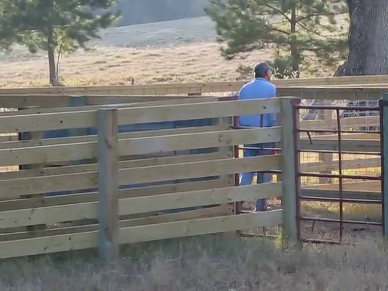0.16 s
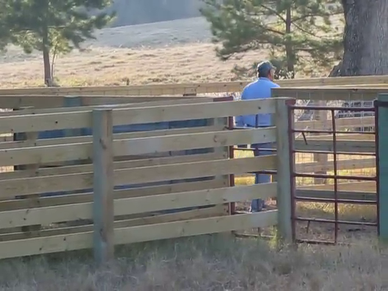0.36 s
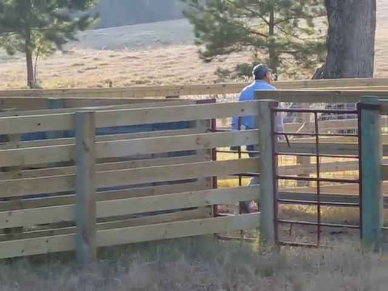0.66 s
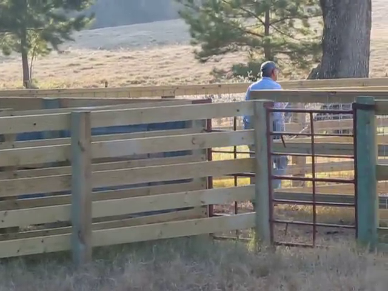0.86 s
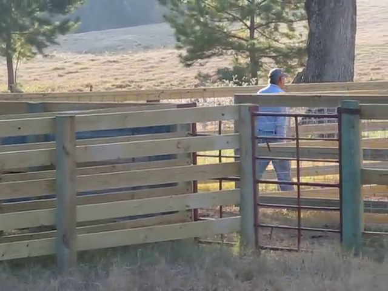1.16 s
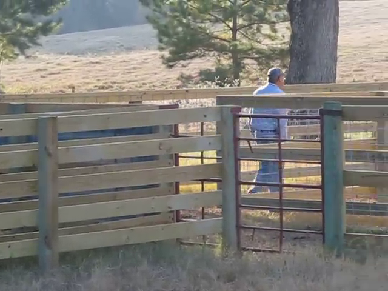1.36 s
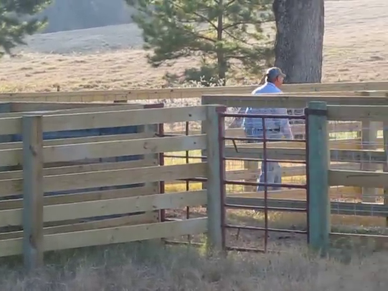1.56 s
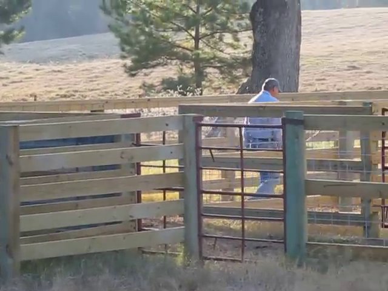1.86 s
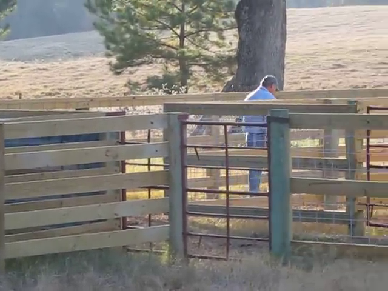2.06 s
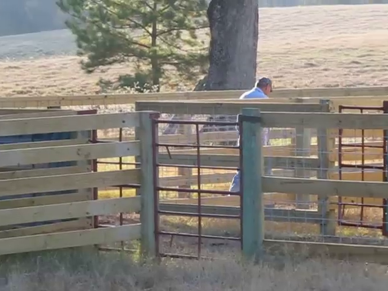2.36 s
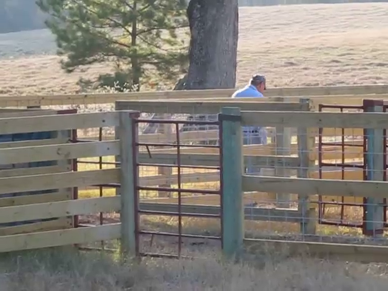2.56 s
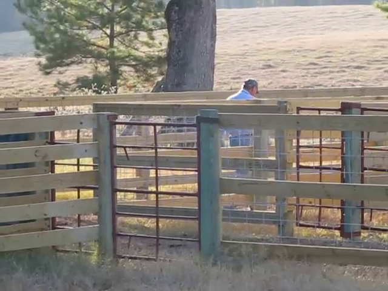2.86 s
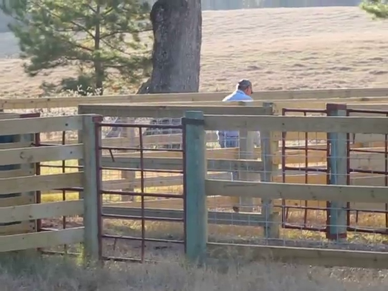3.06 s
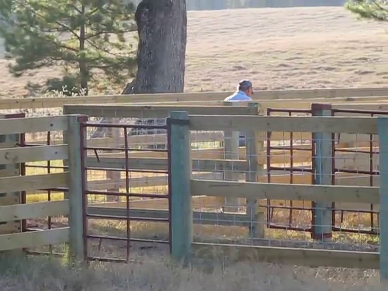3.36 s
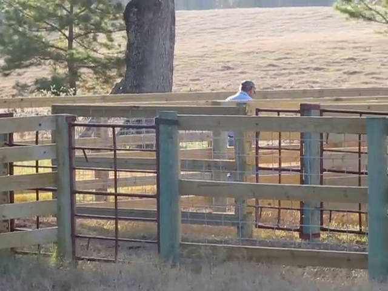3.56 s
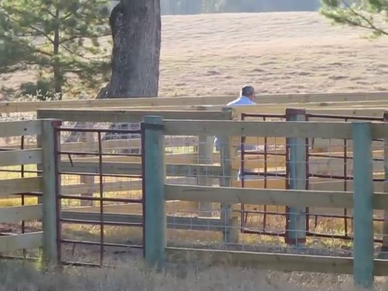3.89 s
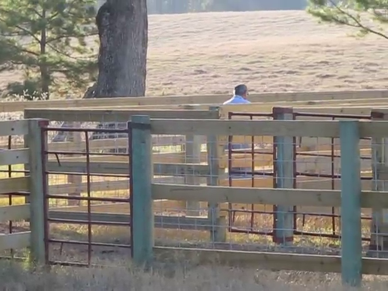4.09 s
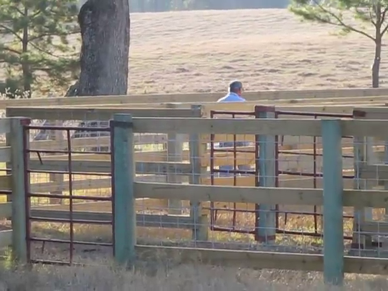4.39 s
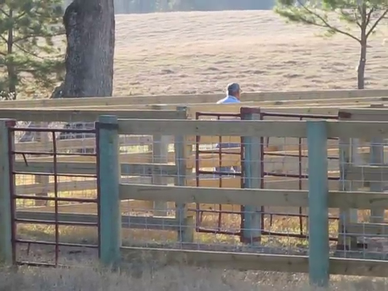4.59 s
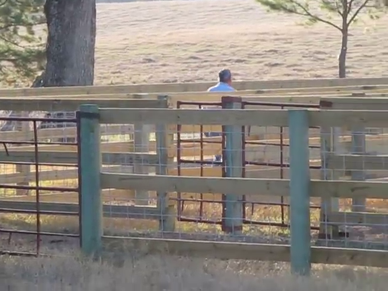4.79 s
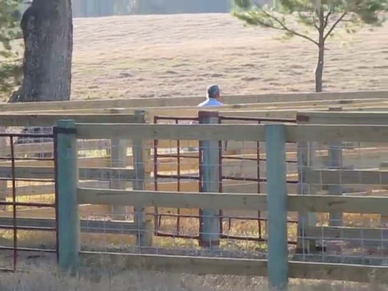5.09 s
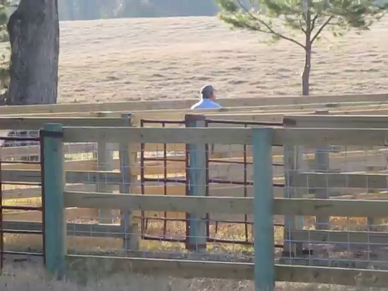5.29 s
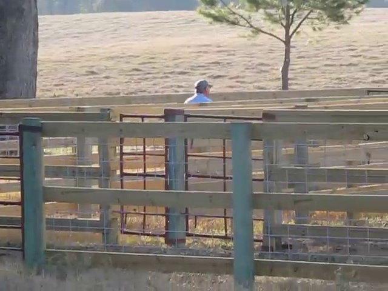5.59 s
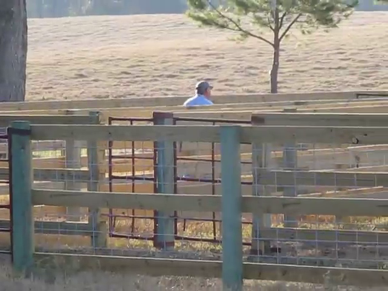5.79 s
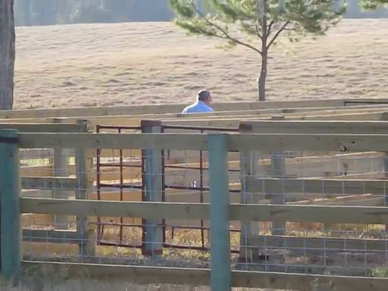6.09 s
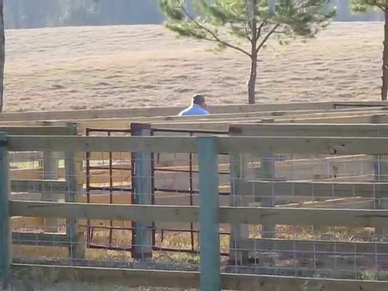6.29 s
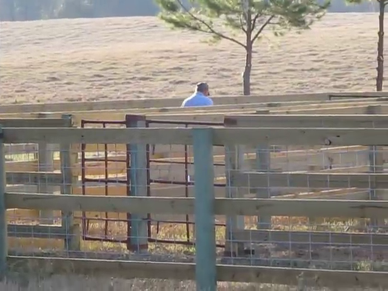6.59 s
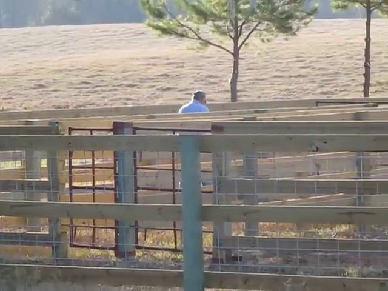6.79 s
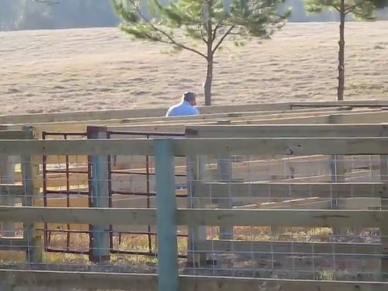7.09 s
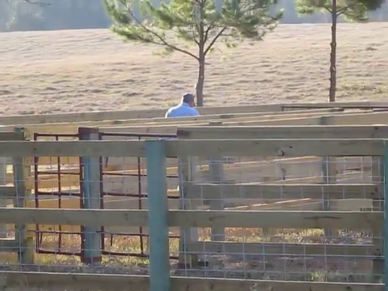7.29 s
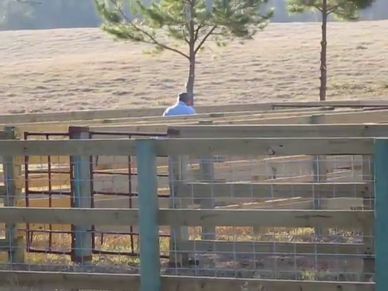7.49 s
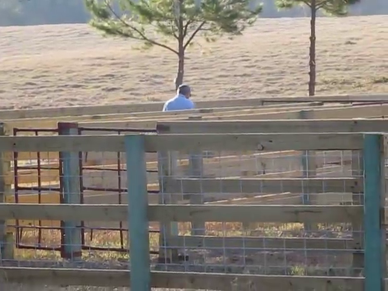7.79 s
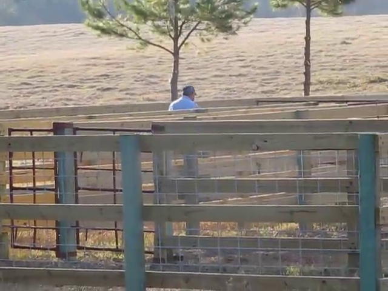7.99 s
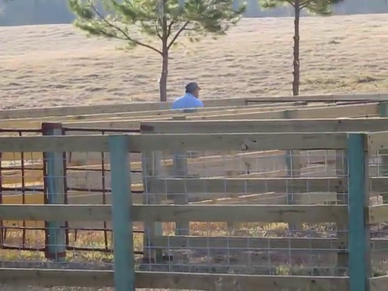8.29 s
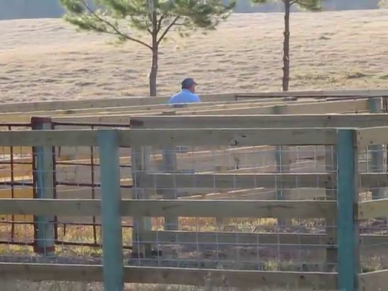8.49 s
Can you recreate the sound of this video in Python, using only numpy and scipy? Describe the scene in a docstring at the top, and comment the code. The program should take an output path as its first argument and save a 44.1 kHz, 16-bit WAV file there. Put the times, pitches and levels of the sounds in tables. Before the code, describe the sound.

Quiet field ambience with light breeze and faint birds, heard through a camera microphone with small close ticks at the start and a faint electronic whine. One distant cow moo soon rises from a low hum into a raspy, open bellow, with a dull tail from fences and trees. Calm follows, with whistling birds, occasional wooden knocks and a barely audible engine, until low wind buffeting swells at the end while the ticks resume.

```python
"""First a lens drive ticks close by, over a thin camera whine, faint bird calls and a light breeze.
Then a cow some way off moos once: fold pulses and turbulence ring nose and mouth resonances,
as a rising closed-mouth hum breaks into a hoarse, open bellow. Boards knock dully; birds are gliding
near-sines, a far engine is two wavering harmonics, and a gust of filtered noise rumbles at the end."""
import sys
import numpy as np
from scipy import signal
from scipy.fft import rfft, irfft
from scipy.io import wavfile
from scipy.ndimage import uniform_filter1d

SR = 44100
rng = np.random.default_rng(int(sys.argv[2]) if len(sys.argv) > 2 else 0)


def generate_wav(sig):
    """Save sig (samples, or channels by samples) to the path in sys.argv[1] as 16-bit PCM at SR."""
    pcm = np.round(np.clip(np.atleast_2d(sig).T, -1, 1) * 32767).astype(np.int16)
    wavfile.write(sys.argv[1], SR, pcm)


N = 381448
TIME = np.arange(N) / SR


def from_db(db):
    """Decibels to gain."""
    return 10 ** (np.asarray(db) / 20)


def rms_one(x):
    """Scale to rms 1."""
    return x / np.sqrt(np.mean(x ** 2) + 1e-20)


def in_time(rows, start_s=0):
    """Each column of a curve, interpolated at every sample."""
    s, *columns = np.transpose(rows)
    return [np.interp(TIME - start_s, s, column) for column in columns]


def at_hz(points, hz):
    """Read a spectrum on a log-frequency axis."""
    f, value = np.transpose(points)
    return np.interp(np.log(hz + 1e-3), np.log(f), value)


def between(start_s, end_s, fade_s):
    """Gate that fades in after start and out before end."""
    return np.clip(np.minimum(TIME - start_s, end_s - TIME) / fade_s, 0, 1)


def attack(start_s, length_s):
    """Gain that rises linearly from 0 to 1."""
    return np.clip((TIME - start_s) / length_s, 0, 1)


def bump(s, db, length_s):
    """Brief bell-shaped swell."""
    return from_db(db) * np.exp(-((TIME - s) / length_s) ** 2)


def cut(x, hz, kind, order=2):
    """Butterworth filter."""
    return signal.sosfilt(signal.butter(order, hz, kind, fs=SR, output="sos"), x + 1e-18)


def drift(rate_hz):
    """Random wavering up to the given rate, rms 1."""
    return rms_one(cut(rng.standard_normal(N + SR), rate_hz, "low")[SR:])


def running_sine(hz):
    """Sine that follows a varying frequency."""
    return np.sin(2 * np.pi * np.cumsum(hz) / SR)


def resonate(x, hz, width_hz):
    """Two-pole resonance, gain 1 at its top."""
    r = np.exp(-np.pi * width_hz / SR)
    zeros = np.array([1, 0, -1]) * (1 - r * r) / 2
    poles = [1, -2 * r * np.cos(2 * np.pi * hz / SR), r * r]
    return signal.lfilter(zeros, poles, x + 1e-18)


def body(x, modes):
    """Parallel resonances, each passed twice so that the valleys stay dark."""
    out = 0
    for hz, width_hz, db in modes:
        pass_hz = width_hz * 1.53  # two passes narrow the peak again
        out = out + from_db(db) * resonate(resonate(x, hz, pass_hz), hz, pass_hz)
    return out


def even(x):
    """Hold the short-term level at 1."""
    return x / np.sqrt(np.abs(uniform_filter1d(x * x, size=2400)) + 1e-12)


def pan(x, left_db):
    """Place a sound by level difference, left minus right."""
    return np.array([x * from_db(left_db / 2), x * from_db(-left_db / 2)])


# hum onset, break into the bellow, folds go slack
HUM_S, BREAK_S, SLACK_S = 1.454, 1.81, 3.02
SLACK_OCTAVES_PER_S, SLACK_DB_PER_S = 31, 143
# vocal folds before slackening: (time [s], pitch [Hz])
FOLD_PITCH = [(1.45, 71.2), (1.55, 86.1), (1.65, 115.6), (1.79, 173.3), (1.9, 191.6), (2.36, 231.4),
              (2.47, 236.2), (2.56, 255.3), (2.68, 253.7), (2.88, 236.4), (3.02, 199.3)]
# hoarseness, clipped to 0-1 in use: (time [s], roughness [ratio])
HOARSENESS = [(1.78, 0.05), (1.88, 0.99), (2.26, 1.02), (2.44, 0.51), (2.57, .76), (2.72, .35),
              (2.88, 0.71), (3.0, 0.97), (3.05, .6)]
# mouth opening: (time [s], level above the closed mouth [dB])
MOUTH_OPENING = [(1.81, -2), (1.96, 17.5), (2.14, 21), (2.28, 23), (2.53, 28.5), (2.73, 29), (2.95, 26),
                 (3.02, 20.5)]


def voice_controls():
    """Pitch, roughness, mouth opening and breath gain; slack folds drop in pitch and die away."""
    slack_s = np.clip(TIME - SLACK_S, 0, None)
    pitch_hz = np.maximum(in_time(FOLD_PITCH)[0] * 2 ** (-SLACK_OCTAVES_PER_S * slack_s), 40)
    rough = np.clip(in_time(HOARSENESS)[0], 0, 1)
    breath = between(HUM_S, 3.2, .05) * from_db(-SLACK_DB_PER_S * slack_s)
    return pitch_hz, rough, in_time(MOUTH_OPENING)[0], breath


def vocal_folds(pitch_hz, rough):
    """Phase, pulses and rasp: strained folds beat in groups of two and four and lose step at random."""
    cycles = np.cumsum(pitch_hz * (1 + .045 * rough ** 2 * drift(89))) / SR
    phase = 2 * np.pi * cycles
    pulses = rms_one(np.diff(np.floor(cycles), prepend=0))
    pairs = 0.61 * np.cos(phase / 2 + 0.42 * drift(15))
    fours = 0.29 * np.cos(phase / 4 + 1.7 * drift(24))
    pulses = pulses * (1 + pairs + fours + 0.32 * rough * drift(140))
    # one short puff of turbulence per cycle
    puffs = .2 + np.cos(phase / 2) ** 4
    rasp = rough * rms_one(rng.standard_normal(N) * puffs)
    return phase, pulses, rasp


HUM_DB, HUM_ATTACK_S, HUM_FOLLOWS_MOUTH, HUM_CHAOS_LOSS_DB = -42, .18, 0.19, 11


def hum(phase, pitch_hz, rough, mouth_db):
    """Fundamental and second harmonic; it grows as the mouth opens and loses strength to chaos."""
    # the second is strong only within a closed-mouth resonance: (frequency [Hz], level [dB])
    closed_mouth = [(150, 0.0), (190, -1.0), (235, -21), (340, -15.5), (430, -11), (470, -20), (510, -18)]
    second = from_db(at_hz(closed_mouth, 2 * pitch_hz))
    slip = 1.1 * rough ** 3 * drift(45)  # chaos blurs the fundamental's line
    gain_db = HUM_DB + HUM_FOLLOWS_MOUTH * mouth_db - HUM_CHAOS_LOSS_DB * rough ** 4
    tone = np.sin(phase + slip) + second * np.sin(2 * phase)
    return from_db(gain_db) * attack(HUM_S, HUM_ATTACK_S) * np.sqrt(2) * tone


# sudden growl surges: (time [s], peak level [dB])
GROWL_SURGES = [(1.948, -32), (2.035, -24.5), (2.101, -26.5), (2.146, -27.5), (2.295, -27), (2.688, -31.5),
                (2.997, -25), (3.024, -31.5)]


def growl():
    """Unsteady 317 Hz tone in short surges."""
    swell = sum(bump(s, db, 0.015) for s, db in GROWL_SURGES)
    return swell * running_sine(317 * (1 + .06 * drift(71)))


NOSE_DB, NOSE_ATTACK_S, NOSE_ROUGH_DB = -38.5, 0.055, 6.5


def nose(pulses, rasp, rough):
    """Nasal resonance at 302 Hz; sets in at the break and grows with roughness."""
    gain = from_db(NOSE_DB + NOSE_ROUGH_DB * (rough - 1)) * attack(BREAK_S, NOSE_ATTACK_S)
    return gain * even(body(cut(pulses * 0.31 + rasp, 211, "high", order=6), [(302, 60, 0)]))


def boards(x, scatter_db=-14, t60_s=.15):
    """Rows of fence boards throw back many small early echoes, which blur the single pulses."""
    t = TIME[:SR // 5]
    fading = rng.standard_normal(len(t)) * from_db(-60 * t / t60_s)
    response = from_db(scatter_db) * rms_one(fading) / np.sqrt(len(t))
    return x + signal.fftconvolve(x, response)[:N]


# closed-mouth levels
THROAT_DB, MUZZLE_DB, HISS_DB = -60.5, -62, -88
# upper resonances fade as the breath runs out
TIRE_S, TIRE_DB_PER_S = 2.3, 1
# above BRIGHT_HZ: dB lost per dB of closing from wide open
BRIGHT_HZ, BRIGHT_FOLLOWS_MOUTH, WIDE_OPEN_DB = 1900, 0.17, 29.5
# lower mouth resonances: (frequency [Hz], width [Hz], relative level [dB])
THROAT_MODES = [(669, 103, -7), (773, 122, 2), (904, 49, 2), (1158, 43, 4.5), (1245.6, 33, 5.5)]
# upper mouth resonances: (frequency [Hz], width [Hz], relative level before bright loss [dB])
MUZZLE_MODES = [(1447, 100, 2), (1530, 88, 4), (1810, 81, 3), (2045, 166, -1), (2350, 152, -6),
                (2800, 79, -11.5)]
# thin hiss of the bellow: (frequency [Hz], width [Hz], relative level [dB])
HISS_MODES = [(3790, 200, -2.5), (5600, 510, -5.5)]


def open_mouth(source, mouth_db):
    """Throat, then muzzle with hiss: resonances that swell with the opening."""
    upper_db = mouth_db - TIRE_DB_PER_S * np.clip(TIME - TIRE_S, 0, None)
    throat = even(cut(body(source, THROAT_MODES), 590, "high", order=6))
    bright_db = BRIGHT_FOLLOWS_MOUTH * (upper_db - WIDE_OPEN_DB)
    opened = [(hz, width_hz, db + bright_db * (hz > BRIGHT_HZ)) for hz, width_hz, db in MUZZLE_MODES]
    muzzle = even(cut(body(source, opened), 3270, "low", order=14))
    hiss = even(body(source, HISS_MODES))
    upper = from_db(MUZZLE_DB + upper_db) * muzzle + from_db(HISS_DB + upper_db) * hiss
    return from_db(THROAT_DB + mouth_db) * throat, upper


def cow(lag_s=.00006):
    """Fold pulses, clean in the hum and chaotic in the bellow, sound through nose and mouth."""
    pitch_hz, rough, mouth_db, breath = voice_controls()
    phase, pulses, rasp = vocal_folds(pitch_hz, rough)
    throat, upper = open_mouth(boards(pulses + 2.2 * rasp), mouth_db)
    low = hum(phase, pitch_hz, rough, mouth_db) + growl() + nose(pulses, rasp, rough)
    left, right = breath * (pan(low, 0.57) + pan(throat, -0.3) + pan(upper, -3.0))
    # the cow stands to the right, so the left port hears it later
    return np.array([np.interp(TIME - lag_s, TIME, left), right])


def strikes(events, modes, decay_s, rise_s):
    """Short gritty contacts ring a body; each event sets its peak."""
    out, count = np.zeros(N + SR), 4000
    t = TIME[:count]
    envelope = np.exp(-t / decay_s) * (1 - np.exp(-t / rise_s))
    for (s, db), grit in zip(events, rng.standard_normal((len(events), count))):
        hit = body(grit * envelope, modes)
        at = int((s - rise_s) * SR)
        out[at:at + count] += from_db(db) * hit / np.abs(hit).max()
    return out[:N]


STEP_S, STOP_AFTER_S, STOP_DB, TICK_SPREAD_DB = .1, .026, -0.5, 1.9
# drive runs: (first step [s], end [s], typical tick peak [dB])
DRIVE_RUNS = [(0.046, 1.09, -46), (7.578, 8.64, -46.5)]
# firmest ticks in those runs: (time [s], least peak level [dB])
FIRMEST_TICKS = [(.147, -41), (.373, -40), (.773, -40.5), (1.047, -38.5), (7.879, -43), (8.279, -43.5)]
# lens housing: (frequency [Hz], width [Hz], relative level [dB])
HOUSING_MODES = [(324, 290, -5.5), (650, 124, 2), (910, 166, 8), (1354, 70, 2), (1656, 150, -1.5),
                 (2560, 180, -5.5)]


def lens_drive():
    """Even steps; the start and stop of each tick in the housing, some firmly."""
    ticks = []
    for first_s, end_s, run_db in DRIVE_RUNS:
        for step_s in np.arange(first_s, end_s, STEP_S):
            for s, db in (step_s, run_db), (step_s + STOP_AFTER_S, run_db + STOP_DB):
                firm = [firm_db for at_s, firm_db in FIRMEST_TICKS if abs(at_s - s) < STOP_AFTER_S / 2]
                usual_db = db + TICK_SPREAD_DB * rng.standard_normal()
                ticks.append((s, max([usual_db] + firm)))
    return strikes(ticks, HOUSING_MODES, decay_s=0.0068, rise_s=.003)


# dull knocks in the pens: (time [s], peak level before echoes [dB])
PEN_KNOCKS = [(4.578, -44.5), (6.958, -44), (7.008, -48), (7.04, -40.5), (7.055, -47), (8.433, -48)]
# board resonances: (frequency [Hz], width [Hz], relative level [dB])
BOARD_MODES = [(420, 60, 14), (621, 59, 12), (925, 145, 12), (1250, 290, -2)]


def pen_knocks():
    """Dull contacts ring the boards."""
    return strikes(PEN_KNOCKS, BOARD_MODES, decay_s=0.01, rise_s=0.00143)


def bird(calls, shape, waver):
    """Near-sine that follows the same glide at every call; a quick waver makes it husky."""
    out, flutter = np.zeros(N), 1 + waver * drift(193)
    for s, hz, db in calls:
        ratio, level_db = in_time(shape, s)
        gate = between(s, s + shape[-1][0], 0.0027)
        out += from_db(db + level_db) * gate * running_sine(hz * ratio * flutter)
    return out


# whistling bird: (start [s], pitch [Hz], level [dB])
WHISTLE_CALLS = [(-.04, 1426, -56.5), (3.55, 1417, -52), (4.025, 1430, -51), (4.58, 1466, -51.5)]
# its arch: (time from start [s], pitch [ratio], added level [dB])
WHISTLE_ARCH = [(0, .77, -18), (.02, .88, -6), (.035, .98, -3), (.052, 1, 0), (.085, .91, 0),
                (.115, .81, -2), (.135, .79, -4), (.16, .82, -18)]
# small bird's chips: (start [s], pitch [Hz], level [dB])
CHIP_CALLS = [(.515, 7200, -65), (2.622, 7870, -58.5), (4.585, 7030, -57.5), (7.315, 7450, -55.5)]
# their dip: (time from start [s], pitch [ratio], added level [dB])
CHIP_DIP = [(0, 1.8, -22), (.012, 1.08, -3), (.022, 1, 6), (.032, 1.01, -1.5), (.045, 1.07, 0),
            (.065, 1.1, -20)]
# faint falling notes: (start [s], pitch [Hz], level [dB])
SLUR_CALLS = [(.79, 2130, -72), (1.485, 2490, -63), (1.55, 2810, -63), (8.15, 3200, -69)]
# their slide: (time from start [s], pitch [ratio], added level [dB])
SLUR_SLIDE = [(0, 0.89, 0), (0.029, 0.97, 8.5), (.08, 0.85, 1), (.14, .82, -8)]


def calling_birds():
    """Arched whistles right of centre; dipping chips and falling slurs left of it."""
    small = bird(CHIP_CALLS, CHIP_DIP, waver=0.022) + bird(SLUR_CALLS, SLUR_SLIDE, waver=0.0232)
    return pan(bird(WHISTLE_CALLS, WHISTLE_ARCH, waver=0.008), -2.5) + pan(small, 1.5)


# trilling bird: (start [s], end [s], mean level [dB])
TRILL_RUNS = [(-.1, 0.288, -62), (3.763, 4.287, -63), (5.696, 6.4, -68.5), (7.26, 7.761, -62)]


def trill(notes_per_s=36, top_hz=3930, fall_hz=330, waver=.009):
    """Quick, slightly uneven run of tiny husky notes, each sliding down."""
    note = np.cumsum(notes_per_s * (1 + .09 * drift(9.9))) / SR % 1  # 0-1 within each note
    runs = sum(from_db(db) * between(start_s, end_s, 0.026) for start_s, end_s, db in TRILL_RUNS)
    level = runs * from_db(1.0 * drift(25))
    hz = (top_hz - fall_hz * note ** 1.2) * (1 + waver * drift(254))
    return level * np.sin(np.pi * note ** 0.6) ** 0.87 * running_sine(hz)


def whine():
    """Camera electronics whistle at 7875 Hz in 30 bursts a second, once for each picture."""
    bursts = np.tanh(3 * (np.sin(2 * np.pi * 30 * TIME) + .5)) + 1
    tone = np.sin(2 * np.pi * 7875 * TIME + .7 * drift(25))
    return from_db(-71.5) * bursts * tone


FAST_EDDY_DB, FAST_EDDY_FOLLOWS, GUST_TOP_DB = 4, 0.98, -23
BUFFET_RISE_DB_PER_S, BUFFET_FALL_DB_PER_S = 550, 330
# breeze, then gust: (time [s], level before wind() adds 3.5 dB [dB])
BREEZE_LEVEL = [(0, -53.5), (.7, -54), (.95, -57), (2.5, -60), (3.3, -51), (3.75, -53), (4, -56),
                (5.3, -60.5), (7.53, -56), (7.72, -43), (7.93, -35), (8.14, -35.5), (8.38, -31),
                (8.65, -38)]
# buffets within the gust: (time [s], peak level before the same 3.5 dB [dB], hold [s])
GUST_BUFFETS = [(7.601, -38, 0.0096), (7.937, -38, 0.017), (8.183, -26, 0.067)]


def wind_strength():
    """Breeze in dB, with buffets that rise fast, hold and fall away."""
    power = from_db(in_time(BREEZE_LEVEL)[0]) ** 2
    for s, db, hold_s in GUST_BUFFETS:
        rise_db = BUFFET_RISE_DB_PER_S * np.clip(s - TIME, 0, 1)
        fall_db = BUFFET_FALL_DB_PER_S * np.clip(TIME - s - hold_s, 0, 1)
        power = power + from_db(db - rise_db - fall_db) ** 2
    return 10 * np.log10(power)


# wind balance: (time [s], left minus right [dB])
WIND_SIDE = [(5.5, -1.5), (7.4, -5), (7.85, -4.5), (8.2, 4.5), (8.36, 12.5), (8.5, -2.5)]


def wind():
    """Partly shared eddies buffet the two microphone ports; stronger gusts reach higher in pitch."""
    gust_db = wind_strength()
    eddies = rng.standard_normal((2, N)) + 0.59 * rng.standard_normal(N)
    slow = rms_one(cut(cut(eddies, 42.8, "low", order=3), 11.8, "high"))
    fast = rms_one(cut(cut(rng.standard_normal((2, N)), 74.6, "low", order=3), 43.3, "high"))
    # small eddies strengthen faster than the wind itself
    fast_db = FAST_EDDY_DB + FAST_EDDY_FOLLOWS * (gust_db - GUST_TOP_DB)
    buffet = cut(slow + from_db(fast_db) * fast, 250, "low")
    steadied = buffet / np.sqrt(uniform_filter1d(buffet ** 2, size=3000) + 0.05)
    return pan(from_db(gust_db + 3.5), in_time(WIND_SIDE)[0]) * steadied


# far engine: (time [s], level [dB])
ENGINE_LEVEL = [(0, -79), (3.8, -75), (5.1, -63.5), (7.1, -65), (8.65, -85)]


def engine():
    """Far, slightly unsteady drone on the second and third orders of a 41.27 Hz shaft."""
    phase = 2 * np.pi * np.cumsum(41.27 * (1 + 0.0084 * drift(3))) / SR
    third = (1 + .25 * drift(5)) * np.sin(3 * phase)
    second = from_db(-5) * (1 + .5 * drift(3)) * np.sin(2 * phase)
    return from_db(in_time(ENGINE_LEVEL)[0]) * np.sqrt(2) * (third + second)


# left-right likeness of the air: (frequency [Hz], correlation [ratio])
AIR_LIKENESS = [(40, 1), (130, 0.84), (300, 0.52), (640, 0.38), (1400, 0.21), (3100, 0.069), (7000, 0.068),
                (15000, 0.14)]


def stereo_noise(spectrum):
    """Steady coloured noise, alike in both ears in the bass and nearly unrelated in the treble."""
    hz = np.arange(N // 2 + 1) * SR / N
    mid, side = rfft(rng.standard_normal((2, N)))
    alike = np.clip(at_hz(AIR_LIKENESS, hz), -1, 1)
    pair = np.sqrt(1 + alike) * mid + np.sqrt(1 - alike) * side * [[1], [-1]]
    return rms_one(irfft(pair * from_db(at_hz(spectrum, hz)), N))


AIR_DB = -53.5
# pasture air colour: (frequency [Hz], relative density [dB per Hz])
AIR_SPECTRUM = [(25, -25), (50, -0.5), (85, -9), (160, -9.5), (300, -11.5), (640, -12.5), (1190, -13),
                (1700, -16.5), (2700, -19), (4000, -17.5), (4800, -21), (7000, -23), (10000, -26),
                (15500, -32.5)]


def pasture_air():
    """Steady background noise of the open field."""
    return pan(from_db(AIR_DB), 0.36)[:, None] * stereo_noise(AIR_SPECTRUM)


# fence and tree echoes, before the wall_hz low-pass: (delay [s], level [dB])
FIELD_ECHOES = [(.013, -28), (.031, -13.5), (.058, -12.5)]


def pasture(x, t60_s=2.67, scatter_db=-13, wall_hz=2400):
    """A few dull echoes and a thin tail scattered by the trees, which return little bass."""
    t = TIME[:2 * SR]
    fading = from_db(-60 * t / t60_s) + 0.83 * np.exp(-t / 0.045)  # near fences answer first
    tail = cut(rng.standard_normal((2, len(t))), 360, "high") * fading * np.minimum(t / 0.012, 1)
    response = rms_one(tail) * from_db(scatter_db) / np.sqrt(len(t))
    for delay_s, db in FIELD_ECHOES:
        response[:, int(delay_s * SR)] += from_db(db)
    echoes = signal.fftconvolve(x, response, axes=1)[:, :N]
    return x + cut(echoes, wall_hz, "low", order=1)


def scene():
    """Animals and knocks in the field, small noises at the camera, engine, wind and air."""
    field = pasture(cow() + pan(pen_knocks(), 0) + pan(trill(), 16.2))
    birds = pasture(calling_birds(), t60_s=3.6, scatter_db=0.0, wall_hz=7000)
    camera = lens_drive() + whine()
    return field + birds + camera + wind() + engine() + pasture_air()


CUTOFF_HZ = 15600


def record(dry):
    """Steep elliptic low-pass cuts the top."""
    return signal.sosfilt(signal.ellip(12, .1, 80, CUTOFF_HZ, fs=SR, output="sos"), dry)


dry = scene()
out = record(dry)
generate_wav(out)
```